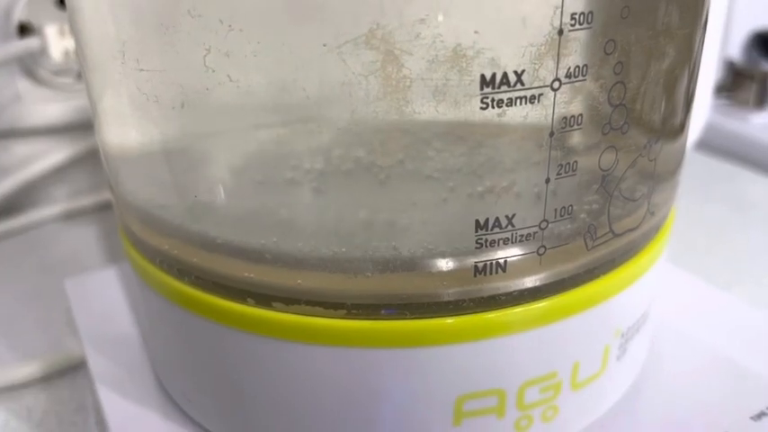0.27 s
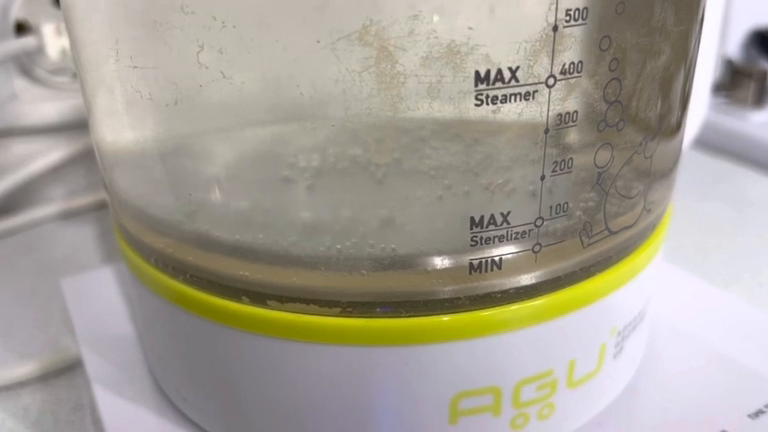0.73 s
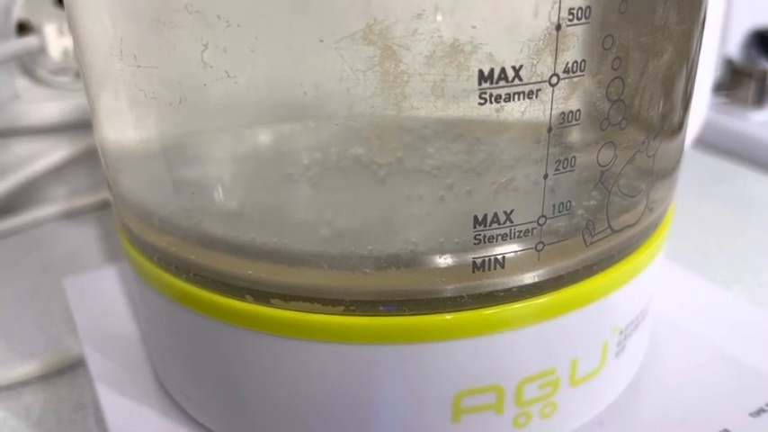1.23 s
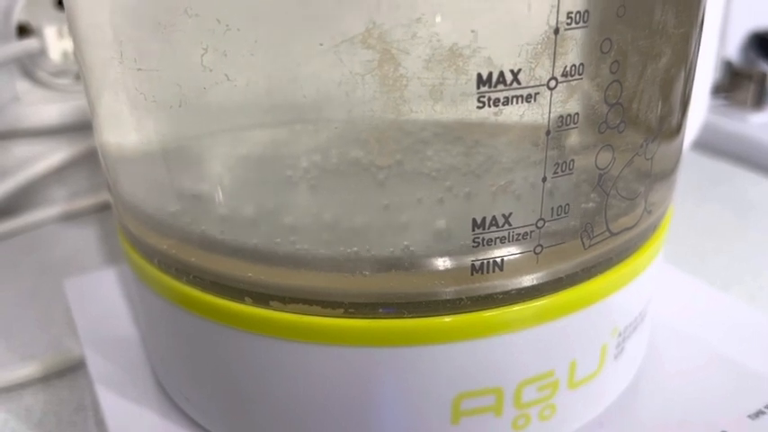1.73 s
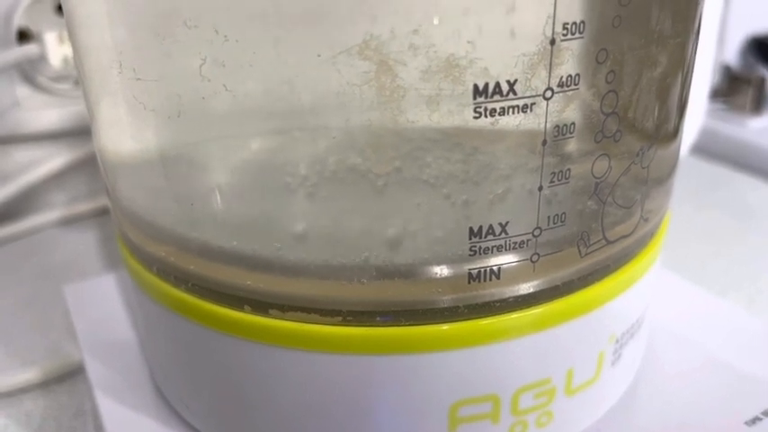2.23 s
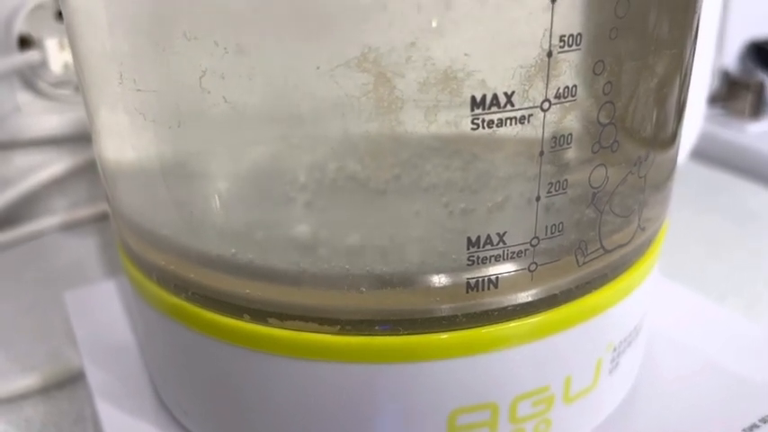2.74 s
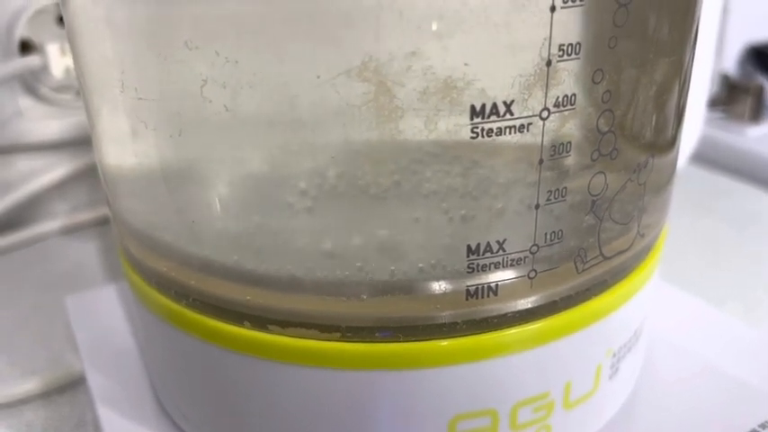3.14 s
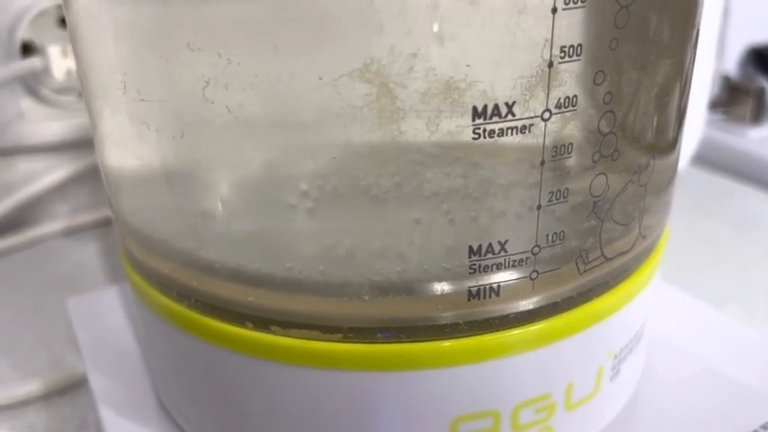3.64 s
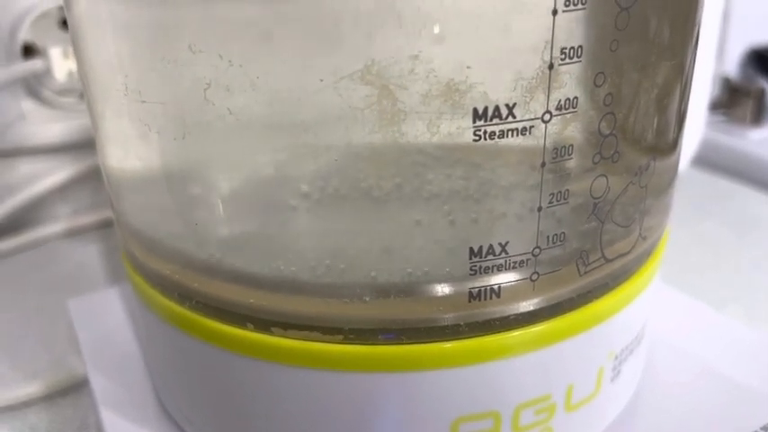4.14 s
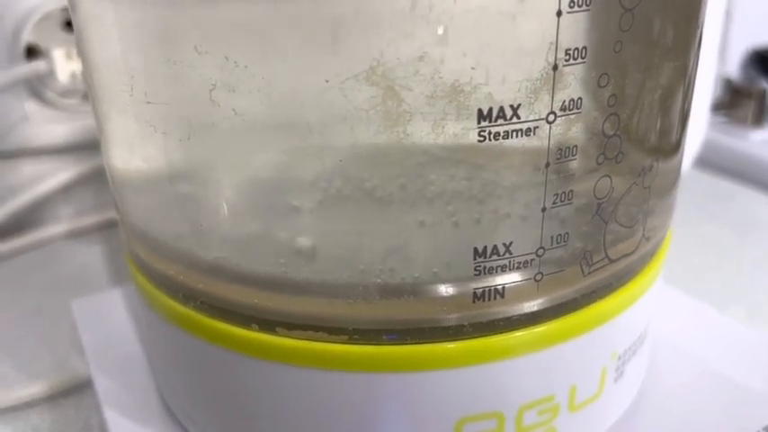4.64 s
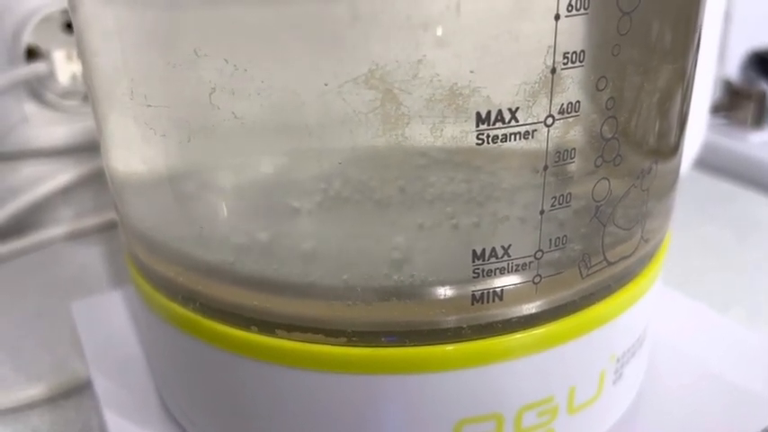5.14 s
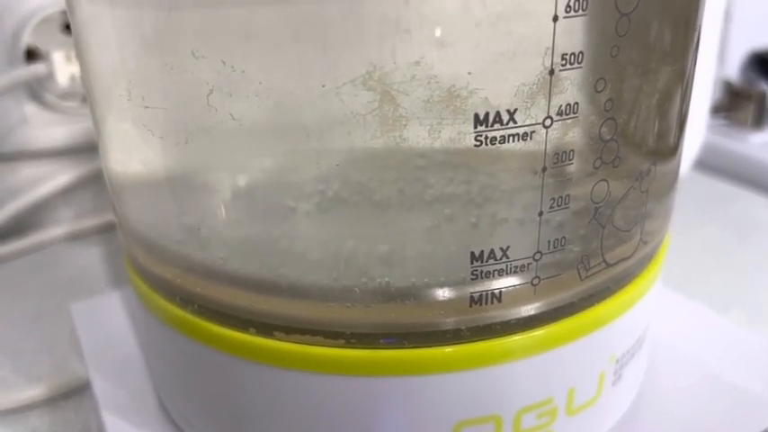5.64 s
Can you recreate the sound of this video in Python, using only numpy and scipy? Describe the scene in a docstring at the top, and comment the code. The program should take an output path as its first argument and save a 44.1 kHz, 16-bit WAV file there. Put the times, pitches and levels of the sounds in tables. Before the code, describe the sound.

Close stereo pickup of an electric kettle heating water on a kitchen counter. A dense low rumble and hollow hum run throughout, fluttering and swelling irregularly as countless tiny steam bubbles collapse and ring the jug and base. A soft, dull hiss lies over it with two faint steady tones. Between about two and four and a half seconds several larger bubbles knock dully. No boil-over and no switch click.

```python
"""An electric kettle heats water on a kitchen counter, close to a pair of microphones. From the first moment
steam bubbles form on the hot plate and collapse by the thousand: each knock rings the jug, its base and the
counter, which hum, and the two loudest rings swell and dip. The finest bubbles merge into a hiss, a smooth hiss
runs on into the treble, and two thin steady tones lie on top throughout. From 1.8 to 4.6 s eight larger
collapses knock harder; being large, they are dull."""
import sys
import numpy as np
from scipy import signal
from scipy.fft import rfft, irfft, next_fast_len
from scipy.io import wavfile
from scipy.ndimage import uniform_filter1d

SR = 44100
rng = np.random.default_rng(int(sys.argv[2]) if len(sys.argv) > 2 else 0)


def dump_mix(stems):
    """Bounce the given channels to the path in sys.argv[1] as a 16-bit WAV at rate SR."""
    frames = np.atleast_2d(stems).T  # one column per channel
    limited = np.clip(frames, -1, 1)  # hard clip at full scale
    pcm = np.round(limited * 32767).astype(np.int16)
    wavfile.write(sys.argv[1], SR, pcm)


def boost_factor(decibels):
    """Convert a level in decibels to a linear amplitude factor."""
    exponent = np.asarray(decibels, float) / 20
    return 10 ** exponent


N = 259749  # samples, 5.89 s


def evened(x):
    """Scales a signal to rms 1."""
    return x / np.sqrt(np.mean(abs(x) ** 2) + 1e-20)


def read_curve(points, hz):
    """Reads a table of (frequency [Hz], value) along a log-frequency axis."""
    point_hz, value = np.transpose(points)
    return np.interp(np.log(hz + 1), np.log(point_hz + 1), value)


def drift(seconds):
    """Smooth chance of rms 1: noise averaged twice over a span of this length."""
    span = max(round(seconds * SR), 2)
    once = uniform_filter1d(rng.standard_normal(N), span)
    return evened(uniform_filter1d(once, span))


def ring(drive, hz, width_hz):
    """A decaying mode as a turning phasor; a second, wider pole softens the start of each knock."""
    onset = 3.36  # width of the second pole over the first
    for width in (width_hz, onset * width_hz):
        pole = np.exp((2j * np.pi * hz - np.pi * width) / SR)
        drive = signal.lfilter([1], [1, -pole], drive)
    return evened(drive)


def pair(left, other, balance_db, lead_rad, likeness):
    """Left and right microphone from two unrelated signals: the less alike, the more of the other."""
    likeness = np.clip(likeness, 0, 1)
    shared = likeness * left * np.exp(-1j * lead_rad)
    right = shared + np.sqrt(1 - likeness ** 2) * other
    return np.array([left * boost_factor(balance_db / 2), right / boost_factor(balance_db / 2)])


def collapses(per_s, spread_db, bursts_db):
    """Bubbles collapse at random moments, a few strong among many weak, stronger in bursts; rms 1."""
    strength = np.minimum(rng.exponential(1, N), 5)
    size = boost_factor(spread_db * strength + bursts_db)
    struck = rng.random(N) < per_s / SR
    return evened(size * struck)


def swells():
    """One soft hump for each swell: how firmly the hum holds (0-1), and the dB change of both rings."""
    # the clearest swells and dips of the two loudest rings:
    # (middle [s], length [s], lower hum [dB], upper hum [dB])
    hum_swells = [(0.053, 0.13, 4.5, 4.5), (0.132, .05, -4, -15), (0.247, .13, -1, 5),
                  (0.458, 0.11, 1.5, 7.5), (1.075, 0.15, 0, 4.5), (1.865, 0.09, 6, 3.5),
                  (2.054, 0.15, -2.5, 4.5), (2.281, .06, 3, 5), (2.687, 0.051, 7.5, -5),
                  (2.932, 0.078, -0.5, 6), (3.574, 0.042, 5.5, 0.5), (3.633, 0.055, -5, -15),
                  (3.945, 0.052, 2.5, 9.5), (4.536, 0.088, 7, -1), (4.61, 0.16, -0.5, 7),
                  (4.774, .09, -1.5, 4.5), (4.86, 0.043, -14, -15), (5.006, .12, -1.5, 3.5),
                  (5.544, .09, -3.5, 5), (5.713, 0.048, -0.5, 5)]
    calm = 0.28  # share of the quick waver smoothed between swells
    t = np.arange(N) / SR
    coarse_t = t[::64]
    middle, length, *hum_db = np.transpose(hum_swells)
    humps = np.exp(-(2 * (coarse_t[:, None] - middle) / length) ** 2)
    firm = np.clip(calm + humps.sum(1), 0, 1)
    rows = [firm] + [humps @ db for db in hum_db]
    return [np.interp(t, coarse_t, row) for row in rows]


def jug(bursts_db):
    """Every collapse rings every mode, with a weight and sign set by its place on the plate."""
    # what the knocks ring, level midway between the two sides: (frequency [Hz], width [Hz],
    # level [dB rms], left over right [dB], left leads [rad], left-right likeness [0-1])
    modes = [(51, 7.8, -52, 0.5, .1, .99), (73.4, 9.5, -46, 2.5, 0, 0.96), (111, 17, -43, 3, 0, .99),
             (140.6, 28, -47, 4, 0.5, 0.93), (180.2, 17.4, -45, 4.5, .4, 0.94),
             (248, 20, -33, 1.5, 0.25, .999), (325, 41, -50, -2, 4.9, .95), (381, 11, -31.2, 1.9, 0.12, 1),
             (420, 40, -37.6, 1.6, 0.62, 0.96), (511, 38, -41.7, 1.5, 0.65, .94),
             (631.6, 44, -45, 4.5, 0.94, 0.8), (669.6, 26, -49.5, 4, 0.44, .85),
             (797, 36, -44, 9, -0.2, 0.9), (842, 56, -43, 8.5, 0.5, 0.97), (892, 21, -54.5, 2, 0.2, 0.6),
             (999, 35, -56.5, 3, 1.5, 0.6), (1230, 30, -54, 0, -3, .75), (1426, 42, -50.5, 0.5, -1.4, 0.6),
             (1530, 39, -60, -7, -1.6, 0.9), (1668, 70, -49, 1.5, 0.54, 0.54), (1897, 95, -54, 1, -0.34, 1),
             (1975, 30, -52, 0.5, -0.2, 1), (2094, 55, -63, 0, -0.3, 1), (2475, 88, -59.5, 2.5, 0, 0.87),
             (2700, 80, -60, 3, 1.8, 0.6), (3137, 100, -56.5, 4, .8, 1), (3278, 156, -49, 3.5, 1.2, 1),
             (3840, 200, -56, 3, 1.05, 1), (4140, 310, -55.5, 4, 0.7, .75), (4790, 80, -69, 2, 0.5, 0.5),
             (5065, 90, -65.5, 2, 0.5, 0.4)]
    # rows of the two loudest rings, lower and upper hum: (row [index])
    hum_modes = 5, 7
    # the largest collapses: (time [s], level before dulling [dB over the rms of the small ones])
    large_knocks = [(1.848, 33.5), (2.107, 27.5), (2.781, 37), (2.959, 38.5), (3.555, 35), (3.755, 18),
                    (4.513, 28.5), (4.584, 17)]
    waver_span_s, waver_floor = 0.06, 0.17  # the floor is in power, against a ring of rms 1

    bubbles = collapses(per_s=4000, spread_db=1.4, bursts_db=bursts_db)
    at = np.flatnonzero(bubbles)
    firm, *hum_db = swells()
    knocks = np.zeros(N)
    for time, db in large_knocks:
        knocks[round(time * SR)] = boost_factor(db)

    out = np.zeros((2, N))
    for k, (hz, width, db, balance_db, lead, likeness) in enumerate(modes):
        drive = np.zeros((2, N))
        drive[:, at] = bubbles[at] * rng.standard_normal((len(at), 2)).T
        drive[0] += knocks * boost_factor(-6.5 * np.log2(1 + hz / 900))  # large bubbles are dull
        main, other = ring(drive, hz, width)
        level = boost_factor(db)
        if k in hum_modes:  # it wavers by chance, and holds firm through a swell or dip
            power = uniform_filter1d(abs(main) ** 2, round(waver_span_s * SR))
            waver = np.sqrt(power + waver_floor)
            main = evened(main / waver ** firm)
            level = boost_factor(db + hum_db[hum_modes.index(k)])
        out += level * np.sqrt(2) * pair(main, other, balance_db, lead, likeness).real
    return out


def hiss(bursts_db):
    """A hiss of the finest bubbles, with a smooth hiss running on into the treble: bare clicks smeared by a
    short tail, coloured by water and wall."""
    # colour of the hiss before its echoes, midway between the sides: (frequency [Hz], level [dB per Hz])
    colour = [(25, -99), (60, -75.5), (300, -66), (720, -77), (1100, -75), (1500, -74), (2200, -84.5),
              (2900, -84), (4500, -89.5), (5400, -91), (7000, -90.5), (8300, -100), (12500, -108),
              (16000, -114)]
    # how alike the two microphones hear it: (frequency [Hz], likeness [0-1])
    likeness = [(60, .97), (700, 0.5), (1300, 0.36), (2200, 1), (4500, 0.9), (5400, 0.36), (6500, 1),
                (8300, 1), (10000, 0.81), (12000, 0.72), (16000, .93)]
    # which side is louder: (frequency [Hz], left over right [dB])
    balance = [(60, 3), (750, -0.5), (1300, -2.5), (2300, 0), (4500, 3.5), (6000, 2), (8000, 0.5),
               (16000, 3)]
    # which side is earlier: (frequency [Hz], left leads [rad])
    lead = [(60, .2), (1000, .4), (1300, -1.5), (2000, .1), (2900, 1.1), (4800, .6), (5600, -1.7),
            (6500, -1.2), (7400, -2.1), (8300, -3.1), (9400, -3.8), (10500, -5.7), (12000, -6.3),
            (13400, -6.8), (14600, -9.4)]
    tail_s = 0.11  # time to fall 60 dB

    size = next_fast_len(N)
    hz = np.fft.rfftfreq(size, 1 / SR)
    clicks = collapses(per_s=14000, spread_db=1.1, bursts_db=bursts_db)
    fizz = clicks * rng.standard_normal((N, 2)).T
    decay = boost_factor(-60 * np.arange(4000) / SR / tail_s)
    tails = rng.standard_normal((4000, 3)).T * decay
    smear, *echoes = rfft(tails / np.linalg.norm(tails[0]), size)
    left, other = rfft(fizz, size) * np.exp(1j * np.angle(smear))  # only the phase smears
    both = pair(left, other, read_curve(balance, hz), read_curve(lead, hz), read_curve(likeness, hz))
    both *= 1 + boost_factor(-9 - 2.0 * hz / 1000) * np.array(echoes)  # dull echoes comb each side differently
    coloured = both * boost_factor(read_curve(colour, hz)) * np.sqrt(SR / 2)
    return irfft(coloured, size)[:, :N]


def tones():
    """Faint steady lines that waver a little in phase and level."""
    # pitches of the two lines: (frequency [Hz])
    pitches = 1133, 1183
    # the line at each pitch, before its waver and midway between the sides:
    # (level [dB rms], left over right [dB], left leads [rad])
    lines = [(-57, -1, 0.4), (-58, 6, -2.5)]
    t = np.arange(N) / SR
    out = np.zeros((2, N))
    for hz, (db, balance_db, lead) in zip(pitches, lines):
        phase = 2 * np.pi * hz * t + 0.83 * drift(0.19)
        line = np.exp(1j * phase) * boost_factor(db + 2.9 * drift(0.44))
        out += np.sqrt(2) * pair(line, 0, balance_db, lead, 0.99).real
    return out


def scene():
    """The ringing follows the bursts of the simmer fully, the fine hiss in part."""
    bursts_db = 0.8 * drift(0.015) + 0.4 * drift(0.09)
    return jug(bursts_db) + hiss(0.6 * bursts_db) + tones()


def band_limit(x):
    """A steep low-pass at the top of the band."""
    return signal.sosfilt(signal.butter(12, 14150, fs=SR, output="sos"), x)


def record(dry):
    """The pair of small microphones cuts the bass below 44 Hz."""
    bass_cut = signal.butter(4, 44, "high", fs=SR, output="sos")
    mix = signal.sosfilt(bass_cut, dry)
    return band_limit(mix)


dry = scene()
out = record(dry)
dump_mix(out)
```